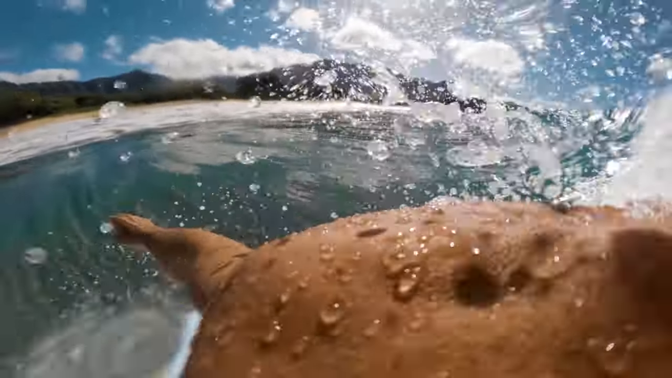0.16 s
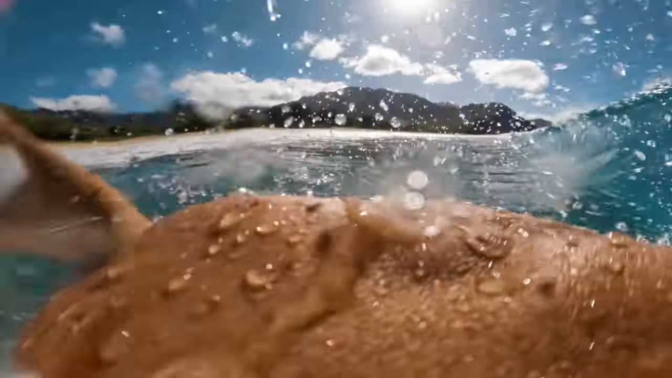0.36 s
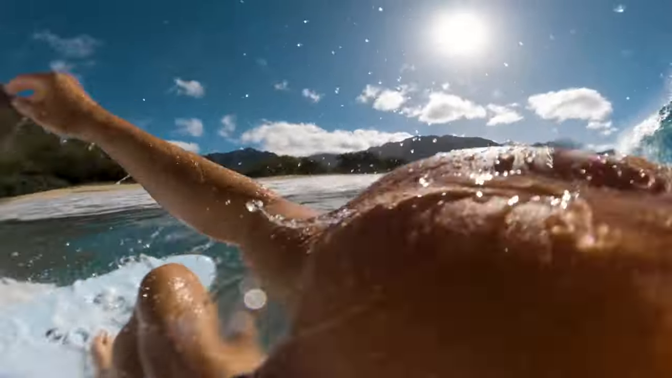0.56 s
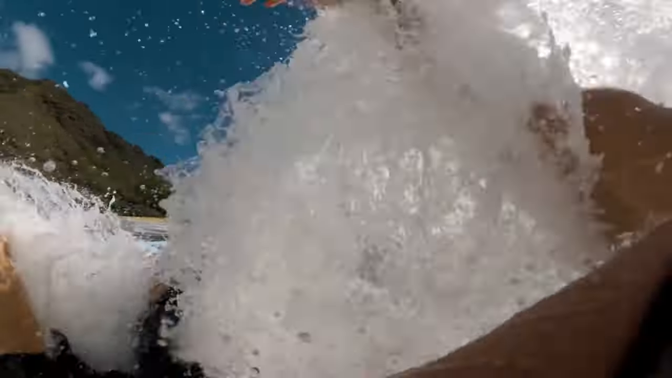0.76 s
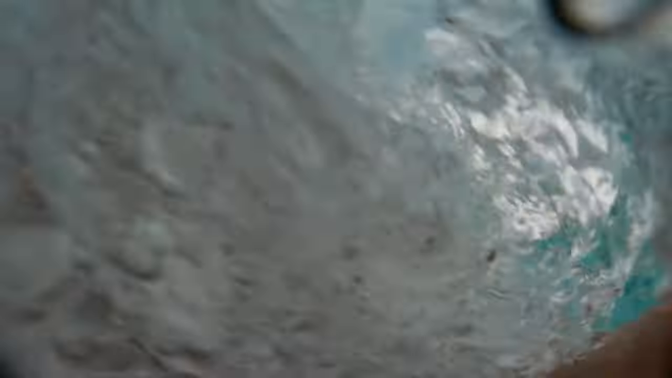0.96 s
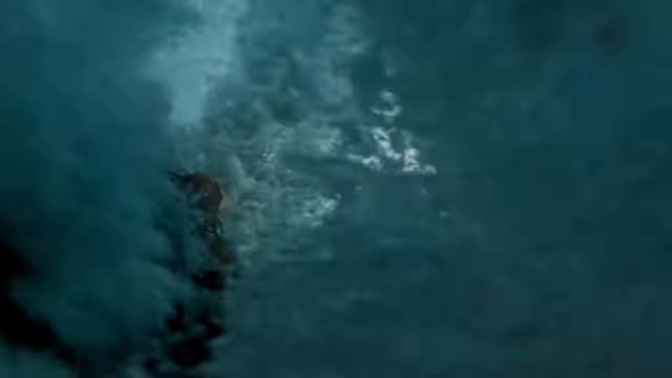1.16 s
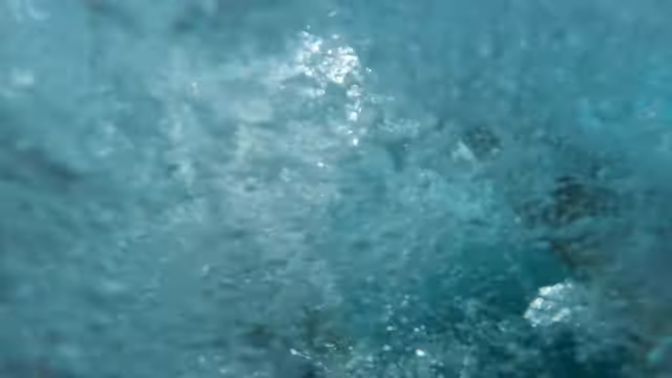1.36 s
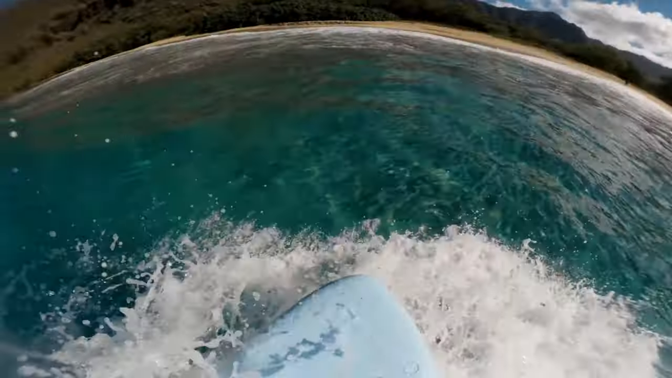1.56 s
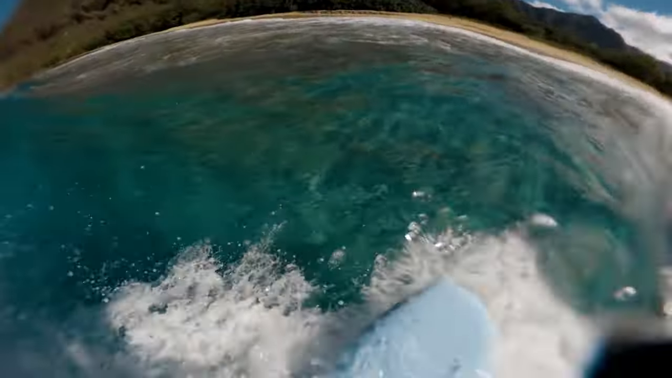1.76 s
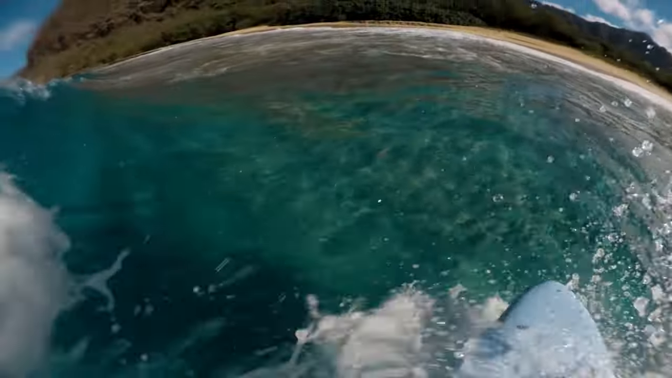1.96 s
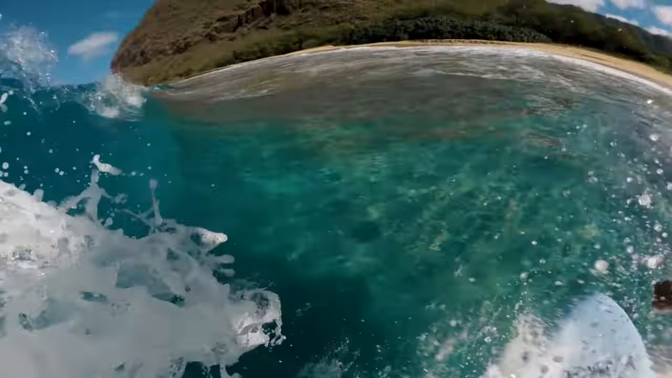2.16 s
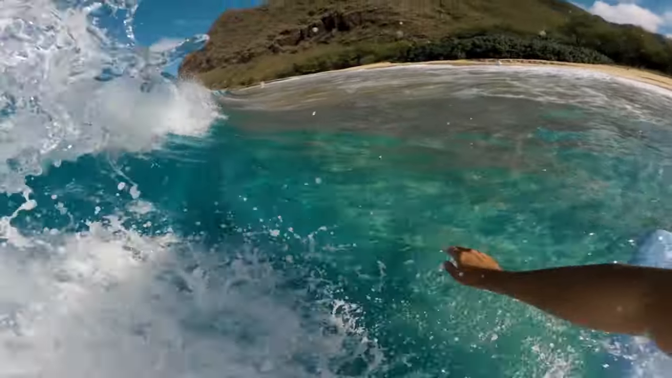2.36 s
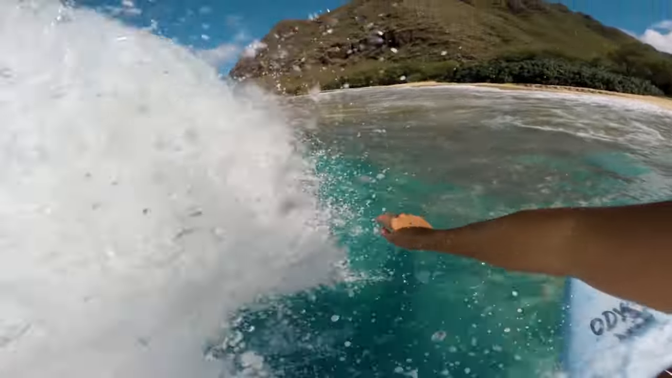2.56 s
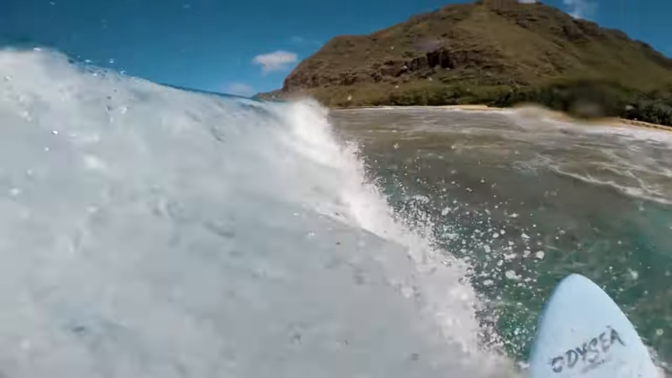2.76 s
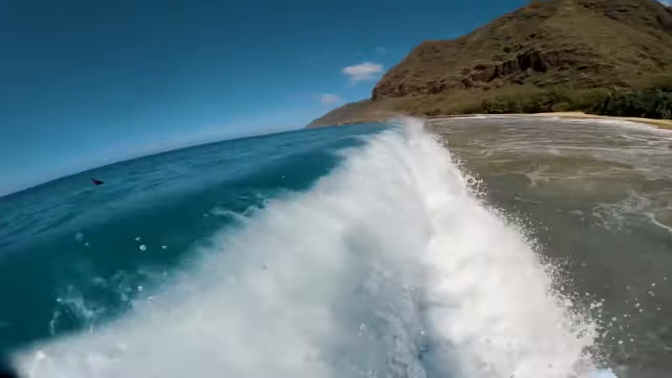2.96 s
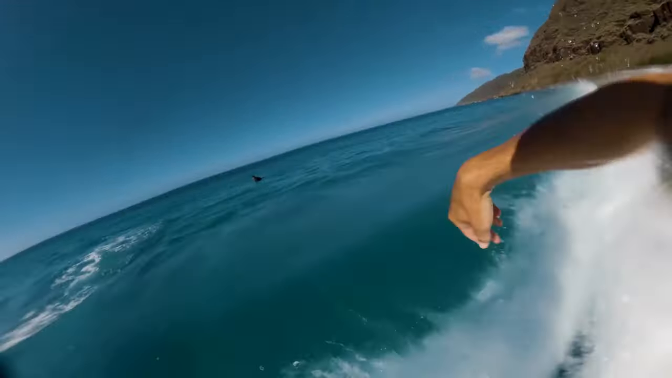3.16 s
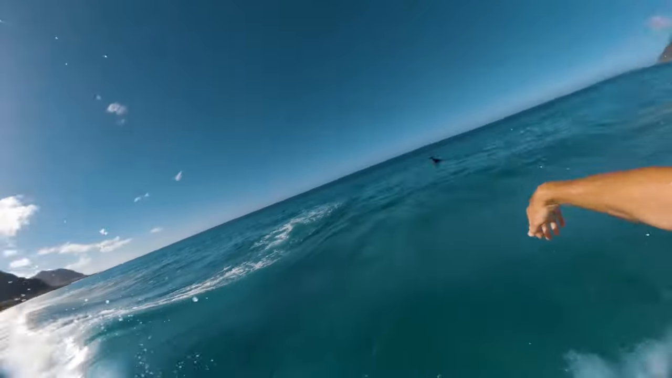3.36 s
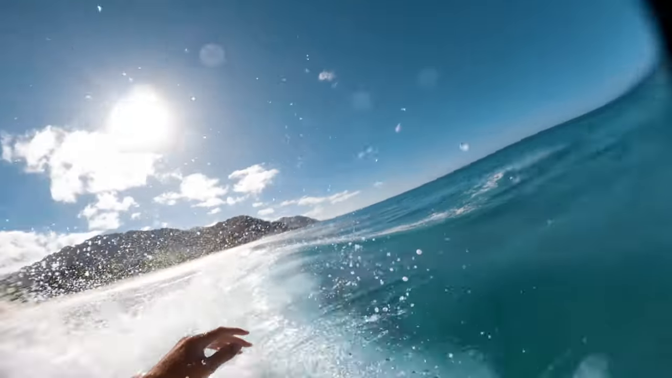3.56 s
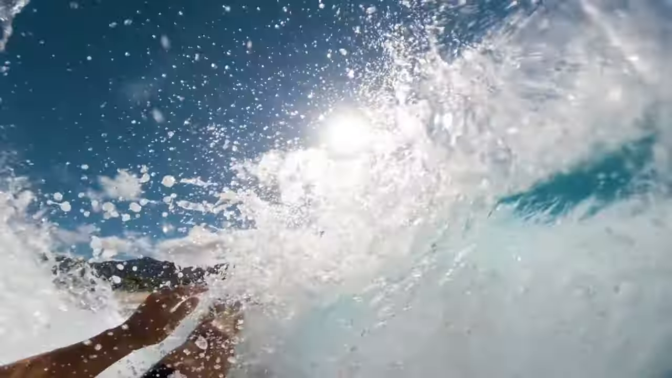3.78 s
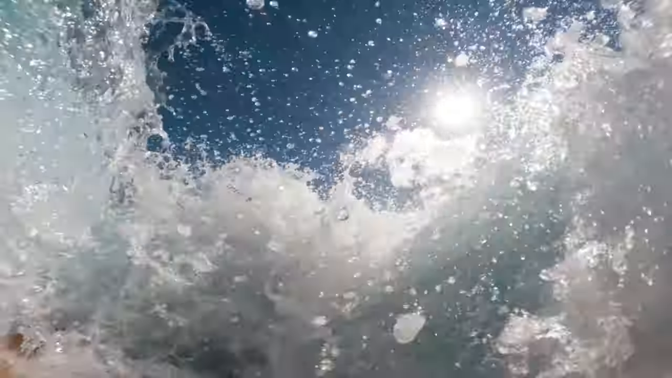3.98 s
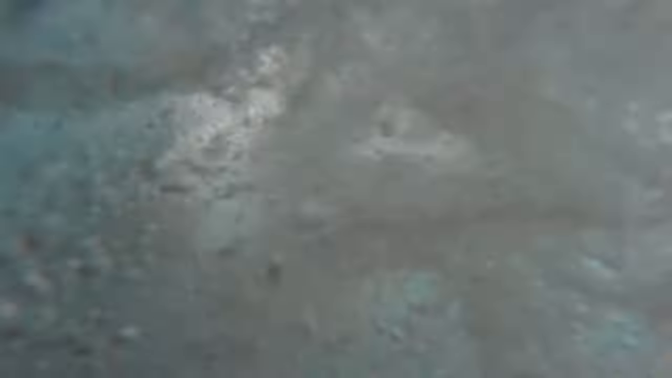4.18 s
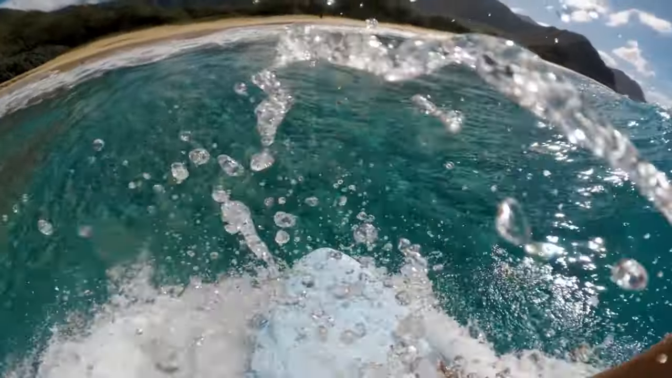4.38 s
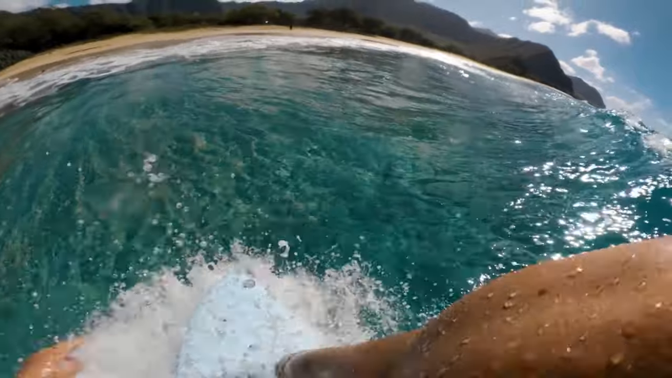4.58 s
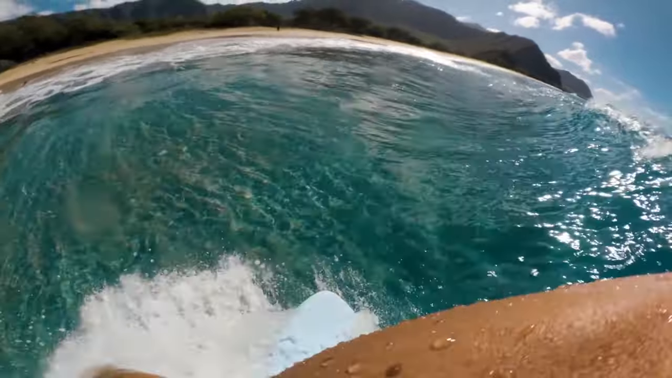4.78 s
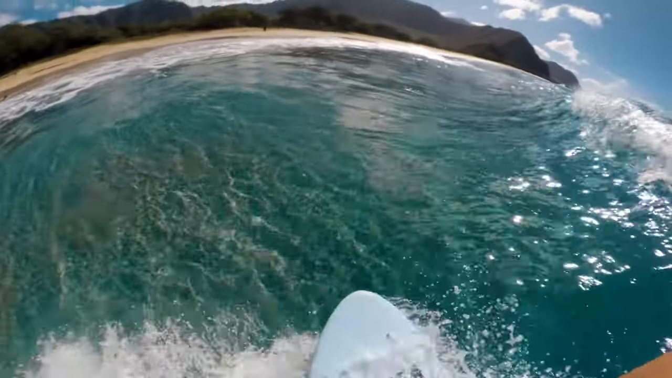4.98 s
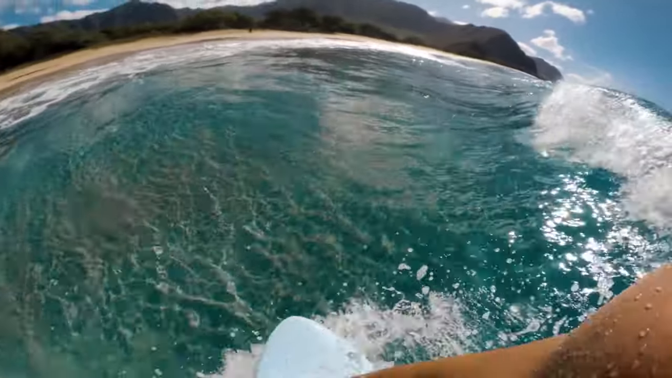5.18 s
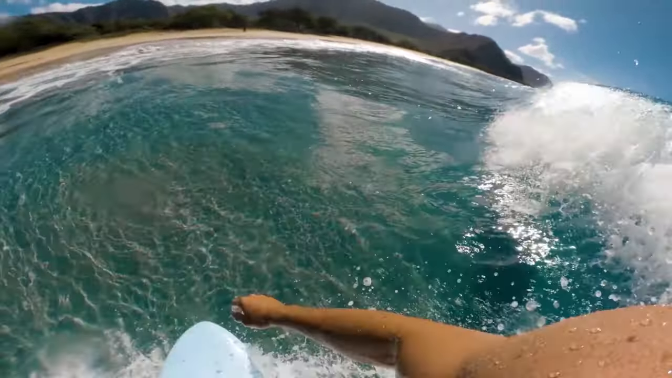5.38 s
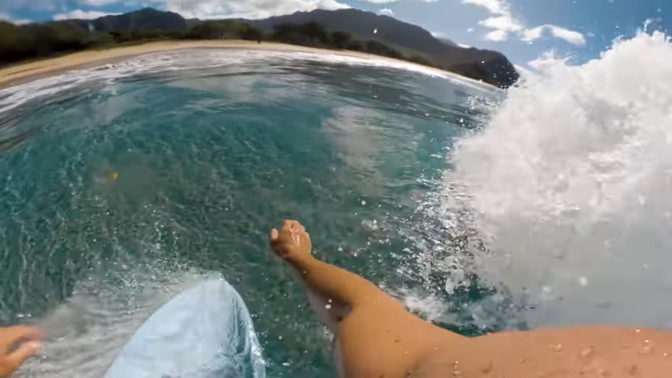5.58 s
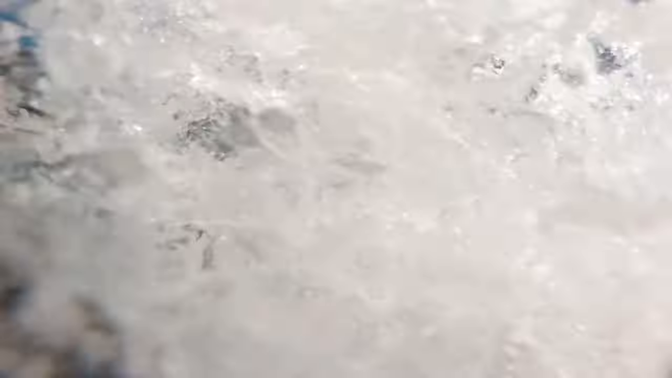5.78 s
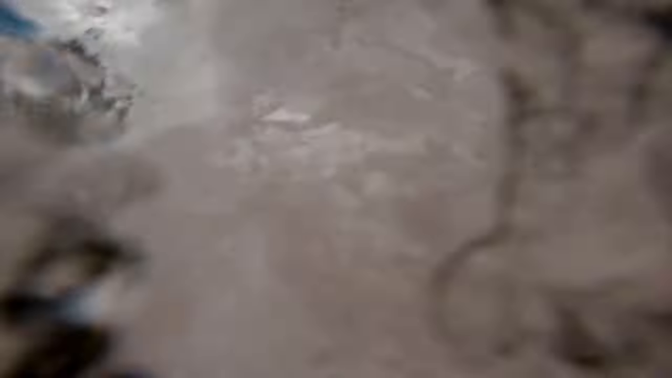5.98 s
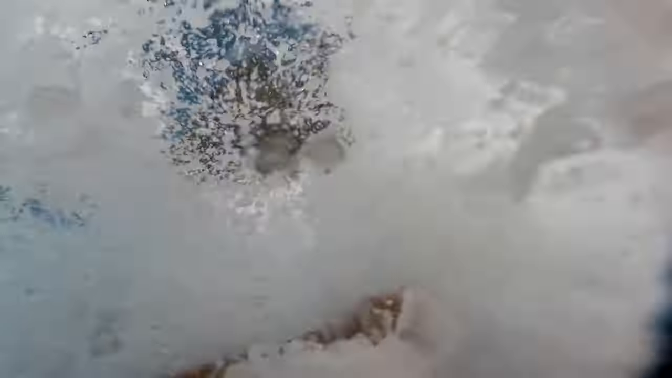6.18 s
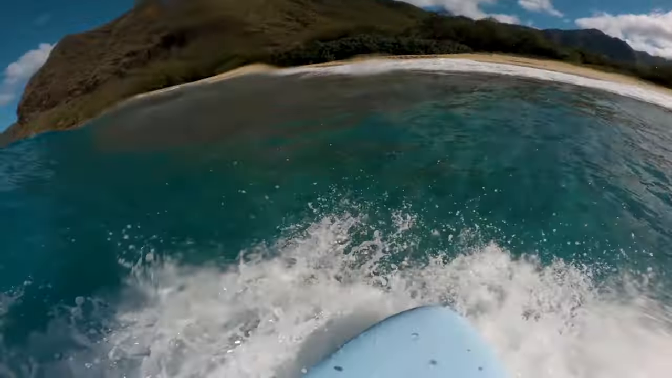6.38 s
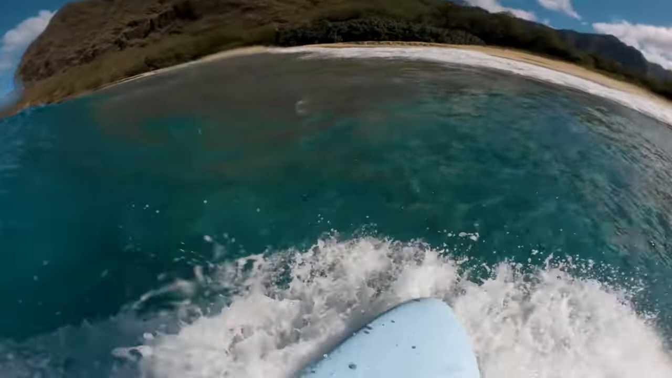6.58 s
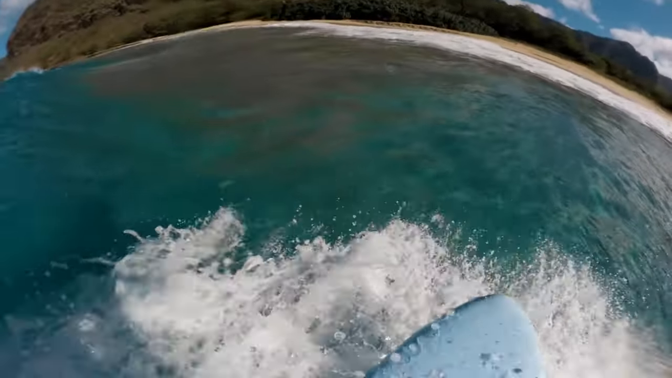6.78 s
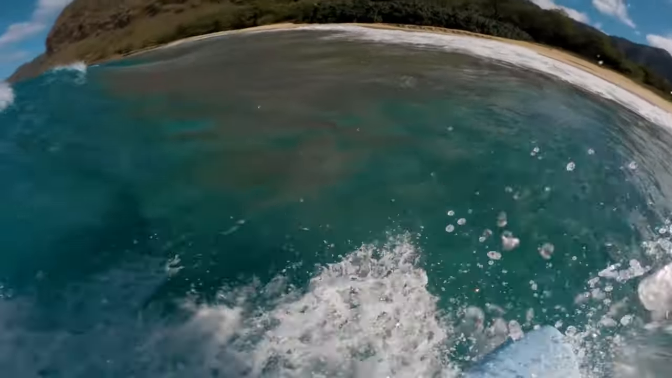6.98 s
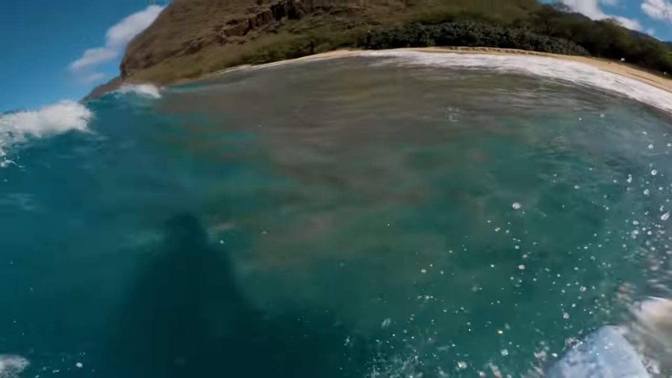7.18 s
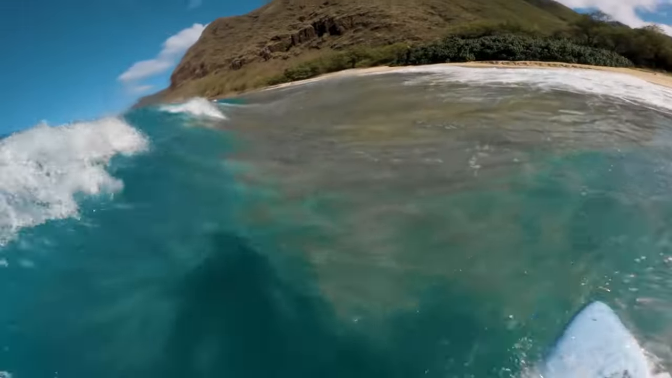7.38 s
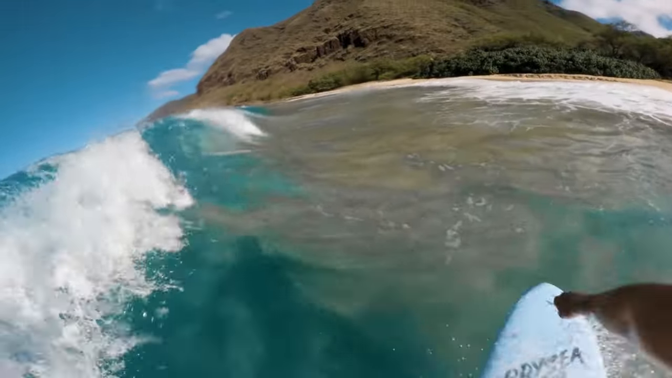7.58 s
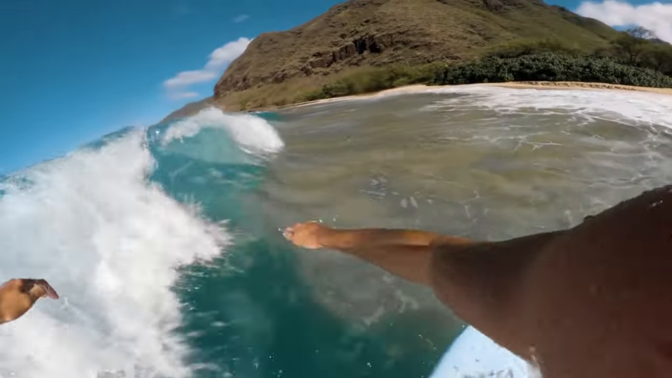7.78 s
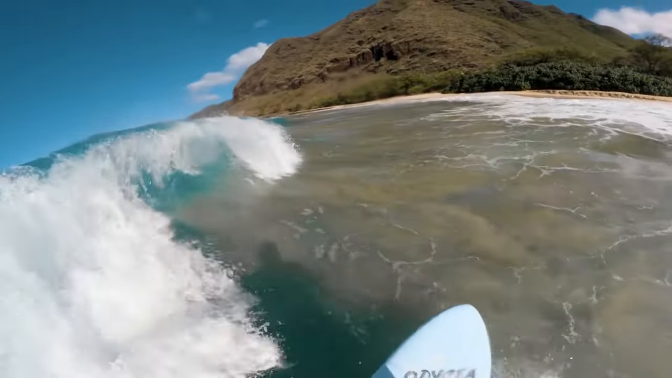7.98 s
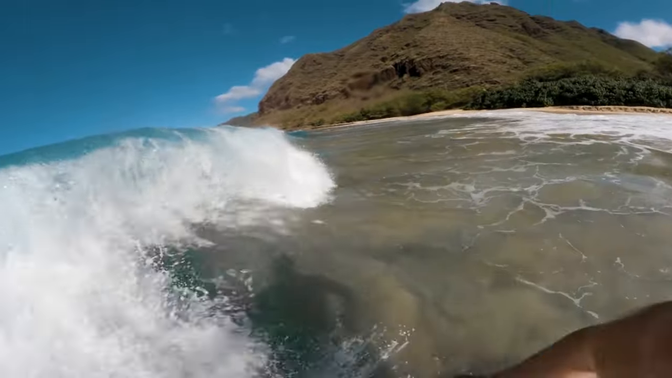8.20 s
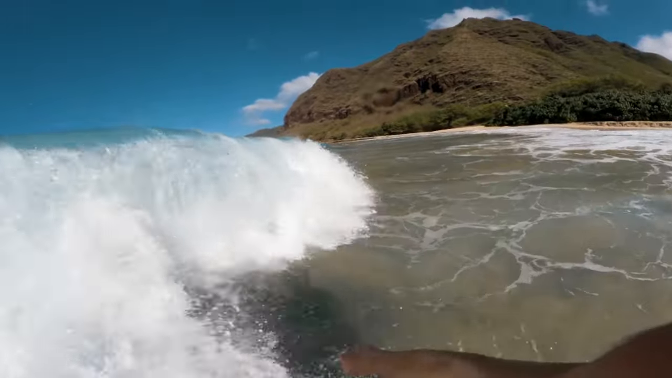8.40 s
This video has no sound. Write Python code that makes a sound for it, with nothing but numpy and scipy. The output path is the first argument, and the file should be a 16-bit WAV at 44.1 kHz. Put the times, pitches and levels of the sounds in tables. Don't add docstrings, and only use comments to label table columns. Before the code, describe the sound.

After almost a second of silence, dull whitewater roar bursts in around a waterproof-cased microphone on a surfboard, with heavy thuds and a splash. A quieter muffled stretch builds with wind buffets, then cuts to a steady roar with sloshing foam hiss. Sharp slaps mark a plunge near six seconds; the last view churns on as hiss returns.

```python
import sys
import numpy as np
from scipy import signal
from scipy.fft import rfft, irfft, next_fast_len
from scipy.io import wavfile
from scipy.ndimage import uniform_filter1d, map_coordinates

SR = 44100
rng = np.random.default_rng(int(sys.argv[2]) if len(sys.argv) > 2 else 0)


def transcribe(u):
    v = np.clip(np.atleast_2d(u).T, -1, 1)
    q = np.round(v * 32767).astype(np.int16)
    wavfile.write(sys.argv[1], SR, q)


def invert_db(level):
    return 10 ** (np.asarray(level, dtype=float) / 20)


N = 372204

# (time [s], click peak [dB])
CUTS = [
    (0.843, -33),
    (1.4768, -39.5),
    (4.2945, -27.5),
    (6.3135, -24.5),
]
# (time [s], roar level [dB])
CHURN = [
    [(0.85, -15.5), (0.956, -19), (1.294, -16.5), (1.36, -24.5), (1.392, -17), (1.47, -22.5)],
    [(1.48, -27.5), (1.5, -34), (1.85, -23), (2.2, -28.5), (2.48, -19), (3.23, -19.5), (3.26, -24.5),
     (4.04, -19.5), (4.29, -13)],
    [(4.3, -28), (4.3, -20), (4.67, -22.5), (5.91, -23.5), (5.93, -19), (6.31, -22)],
    [(6.32, -23), (6.4, -20), (7.13, -20), (7.18, -24), (8.35, -18), (8.44, -21)],
]
# (time [s], level over the wash [dB], rise [s], fall [s])
SHEETS = [(1.14, 9, .015, .03), (1.195, 23, 0.063, .03), (1.26, -9, .04, .015), (1.29, 7, .02, 0.11),
          (1.39, 4, .07, .04), (1.445, -30, 0.037, 0.055), (1.6, -18, 0.055, .04), (2.36, 7, 0.22, 0.15),
          (2.5, 8.5, .015, 0.24), (2.7, 6, 0.12, 0.31), (3.72, 9, 0.23, .1), (3.91, 6.5, .015, 0.63),
          (4.24, 8.5, 0.084, 0.032), (5.45, -23, 0.6, 0.76), (5.935, 14, .1, .04), (6.05, 22, 0.074, 0.04),
          (6.125, 16, .03, .05), (6.27, 6, 0.047, 0.17), (7.8, 14.5, 0.75, 0.73)]
MIDDLING_DB = -21


def unit(x):
    return x / np.sqrt(np.mean(x ** 2) + 1e-20)


def along(points, hz):
    f, v = np.transpose(points)
    return np.interp(np.log(hz + 1), np.log(f + 1), v, left=-120, right=-120)


def by_view(tables):
    t = np.arange(N) / SR
    view = np.clip(np.searchsorted([s for s, _ in CUTS], t) - 1, 0, None)
    columns = []
    for rows in tables:
        times, *values = np.transpose(rows)
        columns.append([np.interp(t, times, v) for v in values])
    chosen = np.choose(view, np.array(columns))
    return uniform_filter1d(uniform_filter1d(chosen, size=70), size=70)


def faded(rows):
    first, last = rows[0], rows[-1]
    return [(first[0] - .1, -90, *first[2:])] + rows + [(last[0] + .1, -90, *last[2:])]


def swells(rows):
    t = np.arange(0, N / SR, .001)
    total = 0
    for s, height, rise, fall in rows:
        away = np.where(t < s, (s - t) / rise, (t - s) / fall)
        total = total + height * np.cos(np.pi / 2 * np.clip(away, 0, 1)) ** 2
    return np.interp(np.arange(N) / SR, t, total)


def wobble(rate_hz):
    knots = rng.standard_normal(int(N * rate_hz / SR) + 4)
    return map_coordinates(knots, [np.arange(N) * rate_hz / SR])


def coloured(x, spectrum):
    m = next_fast_len(N + 8192)
    gain = invert_db(along(spectrum, np.fft.rfftfreq(m, 1 / SR)))
    return irfft(rfft(x, m) * gain, m)[:N]


def rush(spectrum, patchy_db):
    z = signal.stft(rng.standard_normal(N), nperseg=512)[2]
    field = uniform_filter1d(rng.standard_normal(z.shape), size=4, axis=0)
    field = uniform_filter1d(field, size=8, axis=1)
    patchy = signal.istft(z * invert_db(patchy_db * unit(field)), nperseg=512)[1][:N]
    return unit(coloured(patchy, spectrum))


def layer_levels_db():
    # (thud [dB], heave [dB], upper edge [dB], wash [dB], fizz over the foam [dB])
    view_levels = [
        (-17.5, -23.5, -32.5, -47.5, -12),
        (-35, -24.5, -27.5, -50.5, -29.5),
        (-31.5, -26, -33.5, -52.5, -14.5),
        (-35, -25.5, -35, -48.5, -14),
    ]
    return by_view([[(0, *row)] for row in view_levels])


def housing():
    # (frequency [Hz], density [dB/Hz])
    thud_spectrum = [(10, -29.5), (20, 1.5), (40, -1.5), (65, -3.5), (100, -31.5)]
    heave_spectrum = [(50, -33), (80, -4), (140, -1), (220, -2), (320, -15.5)]
    roar_spectrum = [(170, -21.5), (260, -3), (500, -4.5), (800, -6.5), (950, -18), (1200, -54.5)]
    edge_spectrum = [(600, -19), (900, 4), (1150, -2), (1400, -9.5), (1800, -20), (2500, -41.5)]
    # (time [s], level over the thud [dB], rise [s], fall [s])
    buffets = [(1.375, -10.5, 0.16, .05), (1.54, 11, 0.055, 0.092), (1.93, 17.5, 0.026, 0.26),
               (2.25, -9, .1, 0.21), (2.67, 11, .03, 0.22), (2.91, 15, .08, 0.47), (3.25, 13.5, 0.1, 0.33),
               (3.74, 17, 0.45, .05), (4.27, 21.5, 0.25, 0.027), (5.2, 11, 0.64, 1),
               (5.98, 14.5, 0.53, 0.46), (6.31, 7.5, 0.087, 0.16), (6.58, 14, 0.092, 0.089),
               (7.02, 16, 0.064, .06), (7.82, 12.5, 0.46, 0.13), (8.35, 17.5, 0.14, 0.11)]
    # (time [s], level over the heave [dB], rise [s], fall [s])
    lurches = [(1.27, 5, .1, 0.18), (1.75, -7, 0.26, 0.3), (1.93, 3.5, 0.027, .1), (2.06, -5, .08, 0.066),
               (3.3, 5.5, .3, 0.61), (4.0, 4, 0.53, 0.45), (4.62, -10, 0.47, 0.2), (5.95, 10.5, 0.55, 0.48),
               (6.41, 8.5, .04, .05), (6.75, -2, 0.23, 0.11), (7.02, 1, 0.088, 0.037),
               (7.3, 1.5, .15, 0.18), (7.82, 6.5, 0.17, 0.35), (8.27, 6, 0.37, 0.045)]
    # (time [s], level [dB], rise [s], fall [s])
    pockets = [
        (1.26, -15.5, 0.013, .012),
        (5.9, -4, .04, 0.018),
        (6.01, -8.5, .02, .015),
        (6.095, -8.5, 0.01, 0.0095),
        (6.2, -7.5, 0.034, 0.065),
    ]

    thud_db, heave_db, edge_db = layer_levels_db()[:3]
    roar_db = by_view(CHURN)[0] + swells(pockets)
    excess_db = roar_db - MIDDLING_DB
    thud_db = thud_db + swells(buffets)
    heave_db = heave_db + 1.27 * excess_db + swells(lurches)
    edge_db = edge_db + 0.56 * excess_db + 0.19 * swells(SHEETS)

    gust = wobble(14)
    thuds = unit(invert_db(3.6 * gust + 0.4 * wobble(25)) * rush(thud_spectrum, patchy_db=0.0))
    heave = unit(invert_db(1.0 * gust + 1.0 * wobble(40)) * rush(heave_spectrum, patchy_db=-0.47))
    roar = unit(invert_db(0.53 * gust + 1.1 * wobble(60)) * rush(roar_spectrum, patchy_db=1.5))
    edge = unit(invert_db(1.3 * gust + 1.8 * wobble(150)) * rush(edge_spectrum, patchy_db=1.5))
    return invert_db(thud_db) * thuds + invert_db(heave_db) * heave + invert_db(roar_db) * roar + invert_db(edge_db) * edge


def wash():
    # (frequency [Hz], density [dB/Hz])
    trickle_spectrum = [(1000, -28.5), (1500, -0.5), (2000, -4), (4000, -22), (6800, -40.5), (10000, -61),
                        (15700, -79)]
    grain = invert_db(1.1 * wobble(14) + 1.6 * wobble(200))
    level_db = layer_levels_db()[3] + 0.48 * (by_view(CHURN)[0] - MIDDLING_DB) + swells(SHEETS)
    return invert_db(level_db) * unit(grain * rush(trickle_spectrum, patchy_db=2.0))


def foam():
    # (frequency [Hz], density [dB/Hz])
    sea_spectrum = [(700, -20), (1100, -2), (1500, 0), (2000, 0), (3300, 6), (4400, 5), (6300, 3),
                    (7500, -8), (10500, -14), (11800, -20), (12500, -14), (15600, -22)]
    leak_spectrum = [(1200, -23.5), (2000, 0), (3500, 5.5), (5500, -5), (6800, -18), (7500, -39.5)]
    # (time [s], level [dB])
    hiss_curves = [
        [(.85, -65), (1.47, -60.5)],
        [(1.48, -46), (1.57, -51), (1.64, -58), (2.0, -59.5)],
        [(4.3, -37), (4.44, -33), (4.7, -27), (5.2, -22), (5.6, -19), (5.78, -16), (5.82, -20), (5.91, -14),
         (5.955, -30), ],
        [(6.93, -53.5), (7.0, -43), (7.14, -34), (7.57, -24.5), (7.7, -23), (8.44, -22.5)],
    ]
    # (time [s], first notch [Hz])
    film_curves = [
        [(.85, 1900)],
        [(1.48, 3300), (1.53, 3800), (4.28, 3900)],
        [(4.3, 2050), (4.51, 2020), (4.545, 2700), (4.67, 4200), (5.56, 4000), (5.72, 3200), (5.785, 2150),
         (5.83, 1950), (5.97, 1700)],
        [(6.33, 3900), (7.3, 4300)],
    ]
    # (multiple of the notch, spread power, relative width, widening when dry,
    # level [dB], gain when drowned [dB], gain when dry [dB])
    membrane = [
        (.85, 0.033, 0.061, 0.28, -4.5, 189.5, 16.5),
        (1.2, 0.41, 0.098, .7, 1, -40.5, -1),
        (1.92, .2, 0.12, 1.4, -2.5, -60.5, -10.5),
        (2.7, .1, .08, 1.5, -8.5, -120, -1),
    ]
    # (time [s], notch drop [octaves], arrival [s],
    # draining [s])
    sloshes = [(4.3, -.28, .01, .035), (4.35, .06, .03, .03), (4.42, .12, .04, .05),
               (4.475, -.07, .025, .025), (4.585, .46, .04, .095), (4.785, .85, .05, .2),
               (5.125, 1.06, .105, .125), (5.25, .9, .06, .08), (5.335, .3, .06, .06),
               (5.4, .65, .045, .05), (5.5, .58, .05, .06), (5.632, .75, .072, .083), (5.96, .36, .11, .1)]
    # (time [s], level over the hiss [dB], rise [s], fall [s])
    spurts = [
        (4.444, 5.5, .03, .015),
        (5.27, 3.5, 0.038, .015),
        (5.765, 5.5, 0.023, 0.039),
        (5.88, 5, .02, 0.026),
        (7.014, 7, .01, .008),
        (7.14, 6, .015, 0.0066),
    ]
    # (time [s], depth [0-1], rise [s], fall [s])
    plunge = [
        (5.82, 1, .03, .5),
    ]

    hz, frame_s, z = signal.stft(rush(sea_spectrum, patchy_db=1.8), SR, nperseg=320, noverlap=280)
    t = np.arange(N) / SR
    slosh_oct = swells(sloshes)
    notch_hz = by_view(film_curves)[0] * 2 ** -slosh_oct
    ripple = 1 + .025 * np.interp(frame_s, t, wobble(45))
    frame_notch_hz = np.interp(frame_s, t, notch_hz) * ripple
    u = hz[:, None] / frame_notch_hz
    thin = frame_notch_hz / 2200
    under = swells(plunge)
    dry = np.clip(thin - 1.3, 0, None)
    drowned = np.clip(.87 - thin, 0, None) + .09 * np.interp(frame_s, t, under)

    response = 0
    for multiple, spread, width, blur, db, boom_db, lift_db in membrane:
        c = multiple * thin ** spread
        w = width + blur * 3 * dry ** 3 + .3 * drowned
        gain = invert_db(db + boom_db * drowned + lift_db * dry)
        response = response + gain * c / (c * c - u * u + 1j * u * c * w)
    z = z * response
    z = z / np.sqrt(1 + (u / (3.2 * thin ** 1.3)) ** 8)

    share = 1 / (1 + (hz[:, None] / 5300) ** 8)
    parts = np.array([z * share, z * (1 - share)])
    power = np.sum(abs(parts) ** 2, axis=1, keepdims=True)
    parts = parts / np.sqrt(uniform_filter1d(power, size=90))
    body, fizz = signal.istft(parts, SR, nperseg=320, noverlap=280)[1][:, :N]

    level_db = by_view([faded(rows) for rows in hiss_curves])[0] + 3 * slosh_oct + swells(spurts)
    film_loss_db = 20 * np.log2(notch_hz / 4200) ** 2
    fizz_db = layer_levels_db()[4] - film_loss_db + 0.18 * np.clip(level_db - MIDDLING_DB, -15, 9)
    leak = invert_db(-16 - 20 * under) * rush(leak_spectrum, patchy_db=1.5)
    through = unit(body) + invert_db(fizz_db - 0.2) * unit(fizz)
    return invert_db(level_db - 3.0 + 0.32 * wobble(40)) * (through + leak)


def spray():
    # (frequency [Hz], density [dB/Hz])
    slap_spectrum = [(300, -26.5), (900, 9), (2000, -3.5), (4000, -16), (7000, -50), (12000, -57)]
    top_spectrum = [(3500, -19), (5500, 20.5), (8000, 0), (12000, -31), (15600, -47)]
    # (time [s], peak
    # [dB], brightness [dB], length [ms])
    slaps = [(1.1337, -21, -37, 7.4), (1.1408, -23.5, -33, 5.2), (1.1728, -9.5, -31, 3.6),
             (1.19, -22.5, -9, 2.7), (1.203, -36, -33, 7.9), (1.2796, -25, -40, 5), (1.3677, -25, -34, 2.3),
             (1.4604, -26, -24, 1.7), (2.5512, -27, -45, 3.5), (4.0025, -25, -47, 1.9),
             (4.201, -26.5, -25, 4.5), (4.2205, -19.5, -31, 4.7), (4.2601, -25.5, -30, 4.3),
             (5.8075, -11.5, -43, 2), (5.8782, -12.5, -43, 3.3), (5.915, -14.5, -13.5, 4.4),
             (5.9212, -19.5, -25, 24), (5.9346, -16, -27, 3.5), (5.9433, -18, -17, 4.1),
             (5.972, -15.5, -23, 4.2), (5.9917, -27, -26, 6.7), (6.0228, -18.5, -20, 4.8),
             (6.043, -24, -26, 3.3), (6.064, -19.5, -18, 4.9), (6.0751, -20.5, -22, 11.6),
             (6.1056, -22.5, -25, 4.4), (6.1864, -36, -18, 3), (6.254, -26.5, -39, 3.7)]
    # (start [s], spacing [s], drops [count], peak [dB])
    showers = [
        (1.24, .007, 2, -39),
        (1.272, .016, 4, -28),
        (1.33, .013, 8, -36),
        (1.4376, .006, 2, -40),
        (1.467, .01, 1, -39),
        (5.95, .007, 2, -23),
        (6.03, .009, 3, -20),
        (6.115, .009, 3, -30),
        (6.232, .016, 4, -40),
        (3.69, .056, 3, -38),
    ]
    bright_drop_db, drop_ms = -31.5, 6.7
    drops = []
    for s, gap_s, count, db in showers:
        for k in range(count):
            time_s = s + gap_s * (k + rng.uniform(-0.11, 0.14))
            drops.append((time_s, db - rng.normal(), bright_drop_db, drop_ms))

    t = np.arange(SR // 25) / SR
    body, top = np.zeros(N), np.zeros(N)
    for s, db, bright_db, ms in slaps + drops:
        shape = (1 - np.exp(-t / 0.00061)) * np.exp(-(t / (0.00072 * ms)) ** 2)
        start = round(s * SR)
        body[start:][:len(t)] += invert_db(db) * shape
        top[start:][:len(t)] += invert_db(db + bright_db) * shape
    dull = invert_db(5.5) * body * rush(slap_spectrum, patchy_db=2.5)
    bright = invert_db(-5.5) * top * rush(top_spectrum, patchy_db=5.0)
    return dull + bright


def scene():
    return (housing() + wash() + foam() + spray())[None]


def roll_off(x):
    return signal.sosfilt(signal.butter(12, 15730, fs=SR, output="sos"), x)


def record(dry):
    # (time [s], click peak [dB])
    ticks = [
        (2.5477, -47),
    ]
    t = np.arange(N) / SR
    x = dry / (1 + np.abs(dry / .93) ** 8) ** (1 / 8)
    x = x * np.clip((t - CUTS[0][0]) / .001, 0, 1)
    for s, db in CUTS + ticks:
        x = x + (t >= s) * invert_db(db + 10.0) * np.exp(-np.abs(t - s) / 0.0012)
    return roll_off(x)


dry = scene()
out = record(dry)
transcribe(out)
```